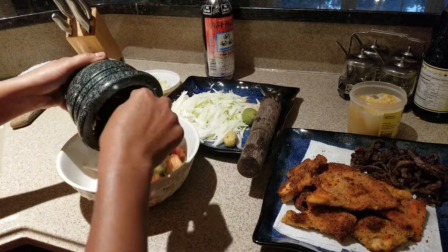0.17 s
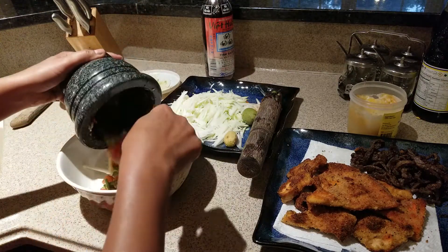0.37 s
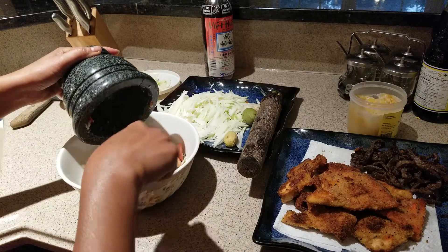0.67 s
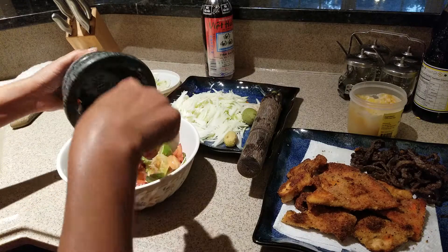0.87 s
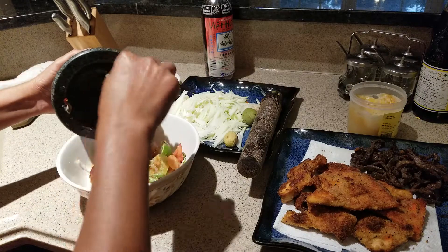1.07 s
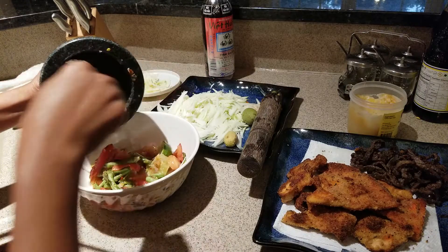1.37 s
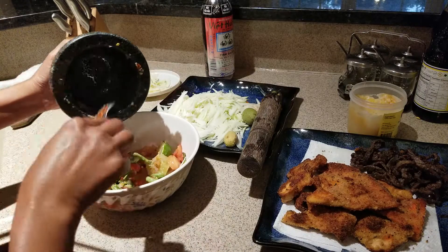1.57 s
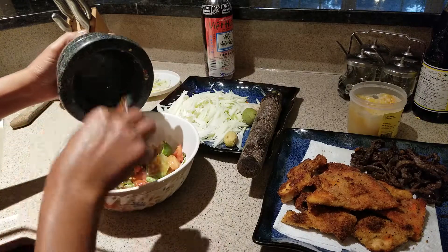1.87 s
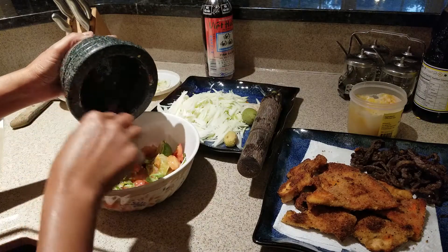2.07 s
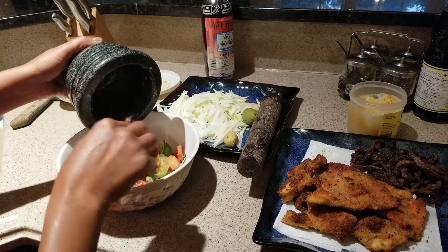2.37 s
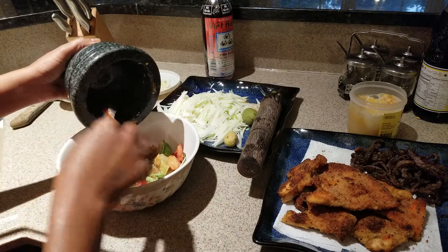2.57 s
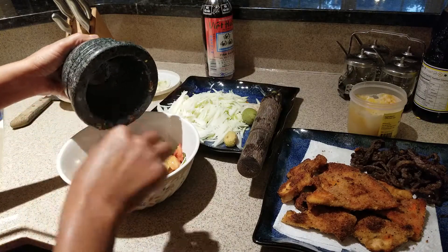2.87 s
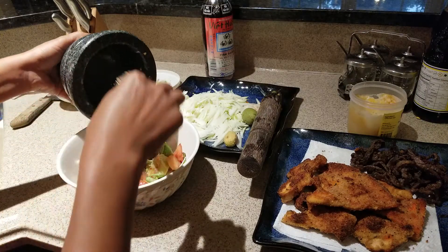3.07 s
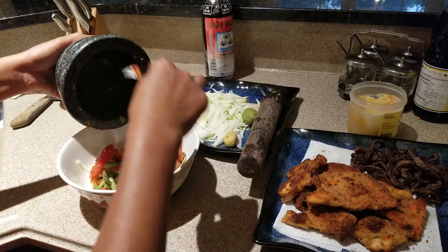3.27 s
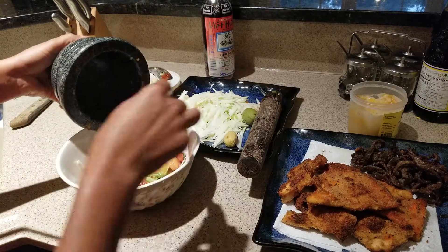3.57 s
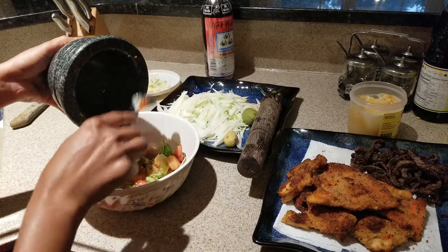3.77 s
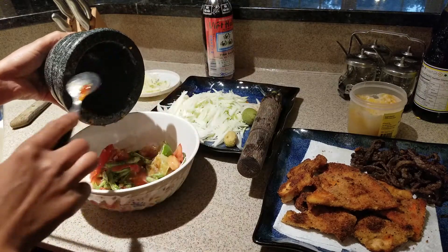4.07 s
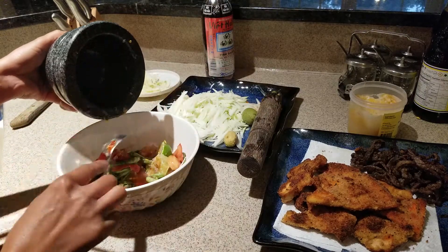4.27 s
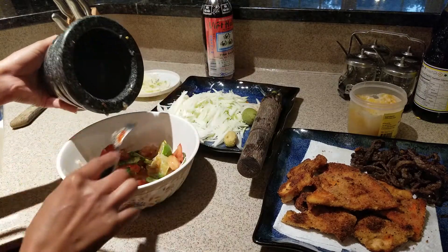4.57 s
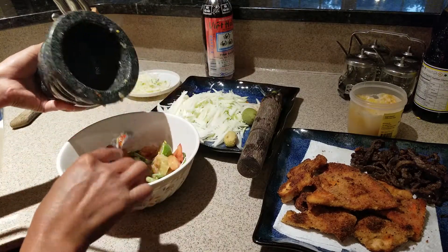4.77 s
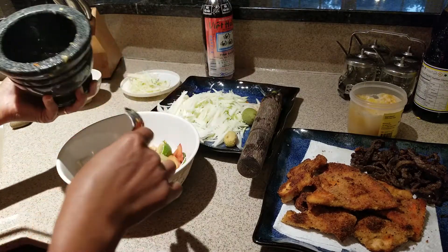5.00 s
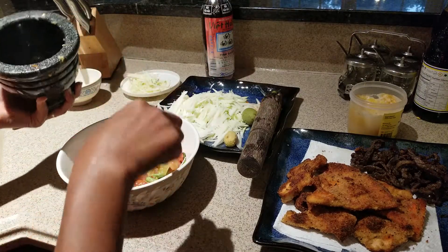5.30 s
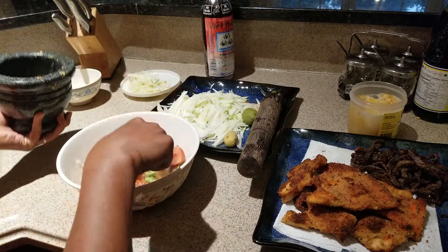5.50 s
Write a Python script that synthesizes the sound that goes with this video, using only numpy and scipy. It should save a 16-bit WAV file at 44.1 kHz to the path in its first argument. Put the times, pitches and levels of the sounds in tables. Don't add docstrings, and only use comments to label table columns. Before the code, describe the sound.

Irregular sharp clinks and short gritty scrapes of steel on stone, with faint wet food ticks, then only low kitchen hum remains.

```python
import sys
import numpy as np
from scipy import signal
from scipy.fft import rfft, irfft, next_fast_len
from scipy.io import wavfile
from scipy.ndimage import uniform_filter1d, map_coordinates

SR = 44100
rng = np.random.default_rng(int(sys.argv[2]) if len(sys.argv) > 2 else 0)


def attenuation_scalar(level_db):
    decades = np.asarray(level_db, float) / 20
    return 10 ** decades


def master_out(mix):
    frames = np.transpose(np.atleast_2d(mix))
    ceiling = np.clip(frames, -1, 1)
    pcm = np.round(ceiling * 32767).astype(np.int16)
    wavfile.write(sys.argv[1], SR, pcm)


N = 248591

# pitch_hz, width_hz, level_db
GRIT_MODES = [(4750, 510, -1.5), (7366, 150, 9), (8630, 130, 2.5), (9730, 45, -1), (5490, 650, -21),
              (6220, 63, 0.5), (8000, 440, -8.5), (10560, 1400, -14), (6540, 6700, -7)]
RING_MODES = [(3975, 75, -6.5), (4068, 56, -2.5), (4155, 28, 2.5)]
STONE_MODES = [(3500, 260, -3.5), (998, 96, -4.5), (1833, 370, -6), (2388, 454, 0.5)]
TIP_MODES = [(13930, 310, 1.5), (12530, 130, 2), (13700, 310, -4.5), (15300, 310, -7), (15450, 490, -11),
             (11670, 520, -12)]
BLOW_DRIVE_DB = [2.7, 5.44, 2.3, 2.7]
# belly_db, shoulder_db, edge_db, neck_db (extra on these modes), stone_db
PLACES = [(1.5, 2.5, -12, -18, 0.5), (9.5, 4.5, 3.5, -14, 5.5), (-6.5, -1, 0.5, 6.5, 2.5),
          (-7.5, -0.5, 1, 9.5, -4), (7, 3, 0, 1.5, 4), (-2.5, -0.5, -3, 10, 0.5), (-1.5, -2.5, -6, -2, 2),
          (-6, -3.5, 0, 9.5, 4.5), (-4.5, 0.5, -3, 5, -4.5), (-6.5, 3, -1, 8.5, 5.5),
          (-1, -0.5, 4, 10, -1.5), (-14, -3, 7.5, -3.5, -2)]
# start_s, peak_db, ring_db, stone_db, tip_db (last three relative to peak)
LANDINGS = [(0.1827, -16, -18.5, 1.5, -10), (0.973, -15, -12, -36, -5.5), (1.3285, -10.5, -20, -33, -1),
            (1.6389, -15.5, -23, -39, -1.5), (2.0204, -8.5, -28.5, -19.5, -27),
            (2.2116, -27.5, -21, -6, -6.5), (2.454, -18, -25, -16.5, -5), (2.7168, -17, -21, -19.5, 3),
            (3.1339, -25, -6, -11, -27), (3.6596, -39, 6, 1.5, -6), (4.0499, -19, -4, -9, -6),
            (4.3889, -12, -3.5, -13, -4)]
LIFTS = [0.33, 1.21, 1.5, 1.78, 2.122, 2.36, 2.6, 2.82, 3.34, 3.8, 4.19, 4.48]
# start_s, peak_db, ring_db, tip_db (last two relative to peak)
CATCHES = [(0.105, -45, -23, -2), (0.247, -17, -13.5, -18.5), (0.2517, -23, -22, -11), (0.264, -8, -28, -5),
           (0.268, -14.5, -10, -16), (1.1108, -14, -23, -26), (1.1142, -9.5, -24, -20),
           (1.1375, -21, -18.5, -18.5), (1.4777, -27, 0, -10), (2.2983, -15, -13, -21),
           (2.5344, -23.5, -2, -22), (2.57, -23.5, -12, -17), (2.769, -33, -19, 7), (2.7794, -34, -11, 7),
           (2.791, -34.5, 3.5, -2), (3.24, -25, -0.5, -15), (3.258, -28, -3, -14),
           (3.2767, -25.5, 4.5, -15), (3.7217, -43.5, 0, -2), (4.1144, -36.5, -3, -11.5)]
# peak_s, grit_db, rise_s, fall_s, tip_db (relative to grit)
DRAGS = [(0.98, -37, 0.0043, 0.27, 2.5), (1.335, -42, .004, .06, -3), (1.387, -42.5, 0.074, 0.079, 8),
         (1.645, -38, 0.0036, 0.026, 9), (1.7, -36, 0.18, 0.084, -2), (2.215, -63, .004, .1, -7),
         (2.262, -37, 0.078, 0.027, -5), (2.458, -29, 0.0059, 0.0048, 4), (2.47, -46.5, 0.0036, 0.21, 5),
         (2.725, -37, .004, 0.062, 0), (2.783, -34.5, 0.046, 0.02, 5), (3.218, -44, 0.16, 0.056, 0),
         (3.758, -52.5, .1, 0.0158, 2.5), (4.4, -40.5, .004, 0.1, 4)]
# peak_s, grit_db, rise_s, fall_s, tip_db (relative to grit)
SCOOPS = [(0.191, -36, .004, 0.047, -11), (0.27, -28.5, 0.018, 0.019, -11.5),
          (0.28, -51, 0.008, 0.13, -10.5), (1.119, -24, .035, 0.088, -15),
          (1.155, -33.5, 0.053, 0.046, -11.5), (1.479, -39, 0.11, 0.034, -13),
          (1.729, -40, 0.011, 0.029, -8.5), (2.03, -28.5, 0.0056, 0.029, -11), (2.07, -58, .02, 0.18, -17),
          (2.303, -29.5, 0.038, 0.02, -6), (2.33, -50.5, .02, 0.2, -8.5),
          (2.538, -34.5, 0.0099, 0.061, -18), (3.139, -57, 0.0044, 0.14, -8),
          (3.268, -32, 0.062, 0.096, -3.5), (3.67, -59, 0.0043, 0.25, -9), (4.06, -40, .004, 0.089, -11),
          (4.116, -44, 0.03, 0.09, 1)]
# peak_s, level_db, rise_s, fall_s
SINGS = [(0.985, -36, .01, 0.18), (1.092, -28, 0.033, 0.078), (1.15, -27, 0.057, 0.043),
         (0.295, -32.5, 0.029, .03), (1.43, -19.5, .08, 0.083), (1.735, -30, .04, 0.14),
         (2.035, -36, .01, 0.16), (2.295, -25.5, 0.054, 0.085), (2.53, -25, .06, 0.057),
         (2.785, -36.5, 0.024, .04), (3.14, -43.5, 0.0031, 0.039), (3.27, -31, 0.057, 0.068),
         (3.668, -42, 0.0034, 0.033), (3.758, -41.5, 0.082, 0.043), (4.06, -34, 0.0036, 0.084),
         (4.12, -34.5, 0.032, 0.087), (4.4, -41, 0.005, 0.015), (4.43, -40, 0.042, 0.05)]
# start_s, peak_db,
# pitch_hz, left_over_right_db
TICKS = [(0.0464, -40, 7650, 8), (0.107, -28, 2460, 3), (0.1363, -36.5, 7560, 4.5), (0.592, -42, 5700, 5),
         (0.824, -36.5, 4300, 15), (0.828, -33.5, 5440, 16), (1.918, -40.5, 12890, 15),
         (1.9415, -44.5, 13600, 0), (1.9744, -46, 4590, 0.5), (3.8611, -58.5, 4820, 9),
         (4.8249, -62, 5100, 6), (4.999, -37, 14800, 10)]
# peak_s, level_db, rise_s, fall_s
RUSTLES = [
    (0.001, -54, .01, 0.072),
    (0.142, -50, 0.053, 0.079),
    (0.592, -54, .02, 0.18),
    (5.442, -65, .12, 0.053),
    (5.502, -76.5, .1, 0.0504),
]
# pitch_hz, decay_s
ECHO_DECAY = [(500, 0.36), (2500, 0.57), (6000, 0.56), (15000, 0.26)]
# time_s, gain_db, fan_swing_db, compressor_db
ROOM_STATE = [(0.0, -1, 6, -11), (0.28, -0.5, -3, -9), (0.78, -0.5, 4, 1.5), (0.92, 0.5, -2.5, 1.5),
              (1.1, -3.5, 1, -7), (1.7, -7.5, 1.5, 0), (2.5, -5, -3.5, -17), (2.9, -7, 0.5, -17),
              (3.25, -8.5, 0.5, -12), (3.9, -7.5, -1.5, -8), (4.3, -2, 1.5, -10), (4.51, -4, 3.5, -10),
              (4.62, -4.5, -1.5, 1), (4.9, -4.5, 2, -8), (5.1, -5, 4.5, -4), (5.34, -3.5, -1, 3),
              (5.56, -3.5, 1.5, -3), (5.64, -4.5, 3.5, -10)]
# pitch_hz, level_db (per Hz)
AIR_COLOUR = [(25, -18.5), (50, -9), (100, -2.5), (160, 1), (310, -5.5), (630, -8.5), (1000, -12),
              (2100, -19), (3200, -27.5), (5000, -32.5), (8000, -36), (9300, -47.5), (13000, -41.5),
              (15800, -43)]
# pitch_hz, likeness (1 = same)
AIR_LIKENESS = [(60, 1), (300, 0.76), (640, 0.48), (1400, 0), (15000, 0.11)]
# pitch_hz, level_db
MIC_TREBLE = [(15600, 0.5), (16300, -22.5), (17000, -41)]

DRAG_RING_DB, DRAG_STONE_DB = -11.5, -17
SCOOP_RING_DB, SCOOP_STONE_DB = -16, -2.5
CATCH_STONE_DB = -16
BLOW_PAN_DB, BLOW_PAN_SPREAD_DB = 2.5, 5.5
BELLY_STONE, EDGE_TIP = 1, 0.6
BELLY_HOLLOW = -0.47
GRIP_DETUNE = 0.013
GAP_HZ, GAP_WIDTH_HZ, GAP_DEPTH = 2916, 364, 0.57
RIGHT_LAG = 8
BLADE_HZ, BLADE_DB, SECOND_DB = 229.8, -45, -58.5
MAINS_DB, PUMP_DB, AIR_DB = -49.5, -50, -49.5
SECOND_FOLLOWS, SECOND_TRADES, MAINS_FOLLOWS = 0.69, 0.72, 0.94


def spoon():
    drive = pressure()
    catches = [(s, db, ring, CATCH_STONE_DB, tip) for s, db, ring, tip in CATCHES]
    blows = LANDINGS + catches
    pans_db = BLOW_PAN_DB + BLOW_PAN_SPREAD_DB * rng.standard_normal(len(blows))
    shared_rub = friction(bumps=2500, spread_db=4.5, smooth=0.69)
    bursts = blow_noise(len(blows))
    edges = [0] + [round((row[0] - 0.015) * SR) for row in LANDINGS[1:]] + [N]
    out = np.zeros((2, N + SR))
    for k, modes in enumerate([GRIT_MODES, RING_MODES, STONE_MODES, TIP_MODES]):
        is_ring, is_stone = k == 1, k == 2
        level = drive[k] * attenuation_scalar(-4.0 + 2.48 * wobble(45))
        rub = shared_rub + 0.87 * rng.standard_normal((2, N))
        force = level * patchy(rub, depth_db=0 if is_ring else 3.5) * attenuation_scalar(left_right(4.4))
        swing = np.abs(irfft(resonances(modes, fft_hz(0)))).max()
        for (s, db, *rel_db), pan_db, burst in zip(blows, pans_db, bursts):
            group_db = ([0] + rel_db)[k] + BLOW_DRIVE_DB[k]
            size = attenuation_scalar(db + group_db + left_right(pan_db)) / swing
            knock = (burst[0] + 0.55 * burst[1:]) / np.linalg.norm(burst[0])
            force[:, round(s * SR):][:, :burst.shape[1]] += size * knock
        for a, b, place in zip(edges, edges[1:], PLACES):
            belly_db, edge_db, stone_db = place[0], place[2], place[4]
            detune = 0 if is_ring else GRIP_DETUNE * rng.standard_normal()
            stone_extra_db = [BELLY_STONE * belly_db, BELLY_HOLLOW * belly_db]
            extra_db = [place[:4], (), stone_extra_db, [EDGE_TIP * edge_db]][k]
            answer = resonances(modes, fft_hz(b - a) * (1 + detune), extra_db)
            sound = filtered(force[:, a:b], answer) * attenuation_scalar(stone_db if is_stone else 0)
            out[:, a:a + sound.shape[1]] += sound
    late_right = np.array([out[0], np.roll(out[1], RIGHT_LAG)])[:, :N]
    return filtered(late_right, bowl_gap(fft_hz(N)))[:, :N]


def pressure():
    drag, scoop = swells(DRAGS), swells(SCOOPS)
    ring = attenuation_scalar(DRAG_RING_DB) * drag + attenuation_scalar(SCOOP_RING_DB) * scoop + swells(SINGS)
    stone = attenuation_scalar(DRAG_STONE_DB) * drag + attenuation_scalar(SCOOP_STONE_DB) * scoop
    rubs = DRAGS + SCOOPS
    tip = swells(rubs, rel_db=[row[-1] for row in rubs])
    return touching() * np.array([drag + scoop, ring, stone, tip])


def touching():
    t = np.arange(N) / SR
    down = sum((t > row[0]) * (t < lift) * 1.0 for row, lift in zip(LANDINGS, LIFTS))
    return uniform_filter1d(down, size=401)


def friction(bumps, spread_db, smooth):
    size_db = spread_db * np.minimum(rng.exponential(size=N), 3.5)
    hit = rng.random(N) < bumps / SR
    grains = hit * attenuation_scalar(size_db) * rng.choice([-1, 1], N)
    clumps_db = 3.3 * wobble(70) + 1.7 * wobble(250)
    return unit((unit(grains) + smooth * rng.standard_normal(N)) * attenuation_scalar(clumps_db))


def blow_noise(count):
    t = np.arange(600) / SR
    fade = attenuation_scalar(-60 * t / 0.0028) + attenuation_scalar(-10.5 - 60 * t / 0.025)
    return rng.standard_normal((count, 3, len(t))) * fade


def bowl_gap(hz):
    damping = 1j * hz * GAP_WIDTH_HZ
    return 1 - GAP_DEPTH * damping / (GAP_HZ ** 2 - hz ** 2 + damping)


def food():
    rustle_modes = [(4416, 2700, -0.5), (7800, 880, -1.5), (12000, 4300, -15)]
    rustle = filtered(rng.standard_normal((2, N)), resonances(rustle_modes, fft_hz(N)))[:, :N]
    out = swells(RUSTLES) * attenuation_scalar(-3 + 1.2 * wobble(27)) * rustle
    t = np.arange(512) / SR
    tick_hz = np.fft.rfftfreq(len(t), 1 / SR)
    noises = rng.standard_normal((len(TICKS), 2, len(t)))
    for (s, db, hz, pan_db), noise in zip(TICKS, noises):
        tick = filtered(noise * attenuation_scalar(-60 * t / 0.013), resonances([(hz, 0.28 * hz, 0)], tick_hz))
        out[:, round(s * SR):][:, :len(t)] += attenuation_scalar(db - 7.5 + left_right(pan_db)) * tick
    return out


def kitchen(x):
    hop, delay = SR // 3, 180
    out = np.zeros((2, N + SR))
    for start in range(0, N, hop):
        hz, t, z = signal.stft(rng.standard_normal((2, SR // 2)), SR, nperseg=256)
        fade = attenuation_scalar(-60 * t / along(ECHO_DECAY, hz)[:, None])
        tail = signal.istft(z * fade, SR, nperseg=256)[1]
        wet = signal.fftconvolve(x[None, start:start + hop], tail / np.linalg.norm(tail[0]), axes=1)
        out[:, start + delay:start + delay + wet.shape[1]] += wet
    return out[:, :N]


def machines():
    gain_db, swing_db, load_db = curves(ROOM_STATE)
    mains_db = MAINS_DB + MAINS_FOLLOWS * gain_db
    pump_db = PUMP_DB + gain_db + load_db
    hum = tone(120, mains_db, lead=-0.037, pan_db=1.5)
    hum += tone(131.5 + 1.1 * wobble(2.8), pump_db + 1.4 * wobble(6), lead=-0.16, pan_db=1.0)
    air_db = AIR_DB + gain_db + 2.0 + 1.7 * wobble(3.86)
    return fan(gain_db, swing_db) + hum + attenuation_scalar(air_db) * air()


def fan(gain_db, swing_db):
    hz = BLADE_HZ + 0.3 * wobble(1.5)
    blade_db = BLADE_DB + gain_db + swing_db
    second_db = SECOND_DB + SECOND_FOLLOWS * gain_db - SECOND_TRADES * swing_db
    out = tone(hz + 0.79 * wobble(9), blade_db + 1.2 * wobble(9.6), lead=-0.24, pan_db=2.5)
    out += tone(2 * hz + 1.32 * wobble(9), second_db + 5.5 + 1.28 * wobble(8), lead=1.54, pan_db=-3)
    out += tone(3 * hz + 2.2 * wobble(9), blade_db - 22 + 0.9 * wobble(5.8), lead=0.3, pan_db=-2.0)
    return out


def air():
    hz = fft_hz(N)
    turn = np.arccos(np.clip(along(AIR_LIKENESS, hz), -1, 1)) / 2
    colour = attenuation_scalar(along(AIR_COLOUR, hz)) * [np.cos(turn), np.sin(turn)]
    mid, side = filtered(rng.standard_normal((2, N)), colour)[:, :N]
    return unit(np.array([mid + side, mid - side])) * attenuation_scalar(left_right(1.4))


def tone(hz, db, lead, pan_db):
    turn = 2 * np.pi * np.cumsum(hz + np.zeros(N)) / SR + left_right(lead)
    return np.sqrt(2) * attenuation_scalar(db + left_right(pan_db)) * np.sin(turn)


def resonances(modes, f, extra_db=()):
    extra_db = list(extra_db) + [0] * len(modes)
    total = 0
    for k, (hz, width, db) in enumerate(modes):
        damping = 1j * f * width
        total = total + (-1) ** k * attenuation_scalar(db + extra_db[k]) * damping / (hz * hz - f * f + damping)
    return unit(total)


def swells(rows, rel_db=None):
    t, out = np.arange(N) / SR, np.zeros(N)
    for k, (s, db, rise, fall, *_) in enumerate(rows):
        near = slice(max(0, int((s - 3 * rise) * SR)), int((s + 3 * fall) * SR))
        lag = t[near] - s
        drop_db = 20 * np.where(lag < 0, -lag / rise, lag / fall)
        out[near] += attenuation_scalar(db + (0 if rel_db is None else rel_db[k]) - drop_db)
    return out


def patchy(x, depth_db):
    z = signal.stft(x, nperseg=256)[2]
    field = uniform_filter1d(rng.standard_normal(z.shape[1:]), size=4, axis=0)
    field = uniform_filter1d(field, size=9, axis=1)
    y = signal.istft(z * attenuation_scalar(depth_db * unit(field)), nperseg=256)[1][:, :N]
    return x.std() * unit(y)


def wobble(rate):
    knots = rng.standard_normal(int(N * rate / SR) + 4)
    return map_coordinates(knots, [np.arange(N) * rate / SR])


def curves(rows):
    s, *cols = np.transpose(rows)
    return np.array([np.interp(np.arange(N) / SR, s, c) for c in cols])


def along(points, hz):
    f, v = np.transpose(points)
    return np.interp(np.log(hz + 1), np.log(f + 1), v)


def left_right(difference):
    return np.array([[difference], [-difference]]) / 2


def unit(x):
    return x / np.sqrt(np.mean(np.abs(x) ** 2) + 1e-20)


def fft_hz(n):
    return np.fft.rfftfreq(2 * next_fast_len(n // 2 + SR // 4), 1 / SR)


def filtered(x, response):
    m = 2 * (response.shape[-1] - 1)
    return irfft(rfft(x, m) * response, m)


def scene():
    near = spoon() + food()
    return near + attenuation_scalar(-11.0) * kitchen(near[0]) + machines()


def low_pass(x):
    return signal.sosfilt(signal.butter(12, 17030, fs=SR, output="sos"), x)


def record(dry):
    mix = filtered(dry, attenuation_scalar(along(MIC_TREBLE, fft_hz(N))))[:, :N]
    return low_pass(mix)


dry = scene()
out = record(dry)
master_out(out)
```